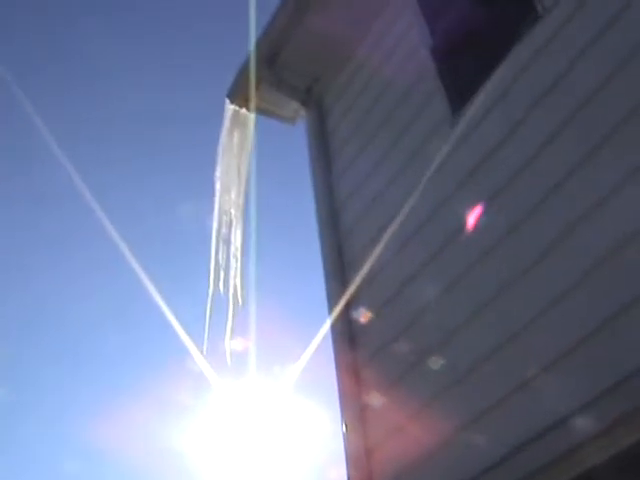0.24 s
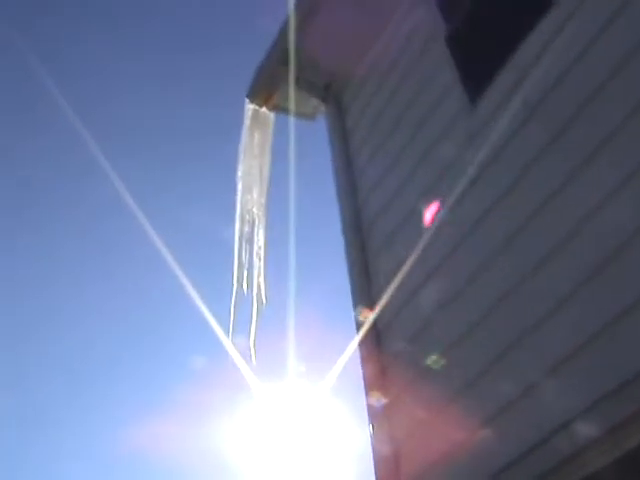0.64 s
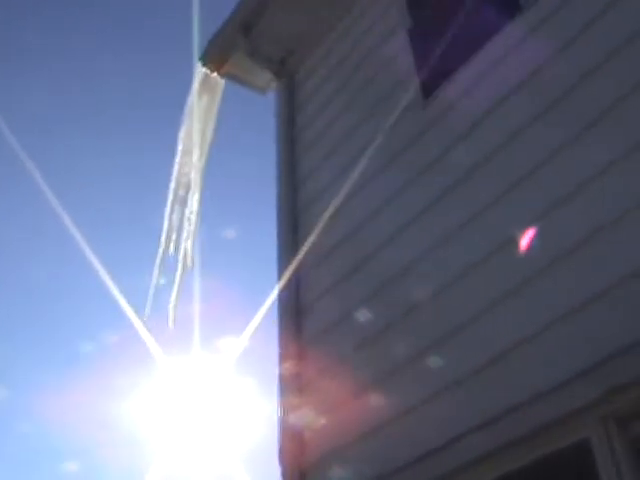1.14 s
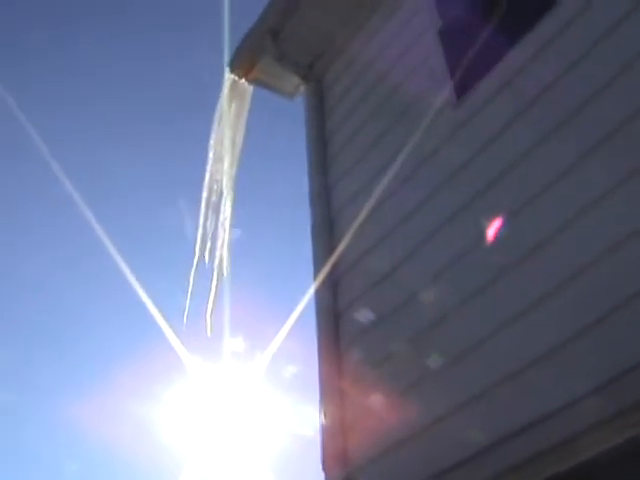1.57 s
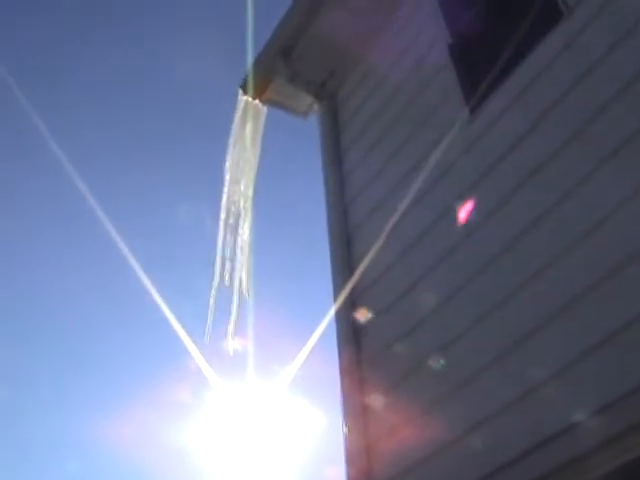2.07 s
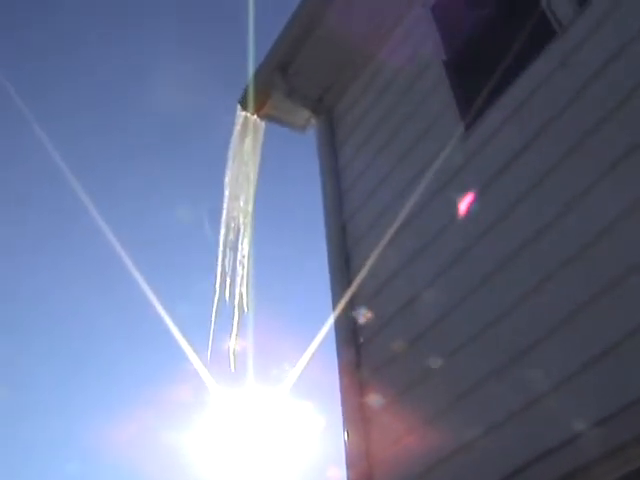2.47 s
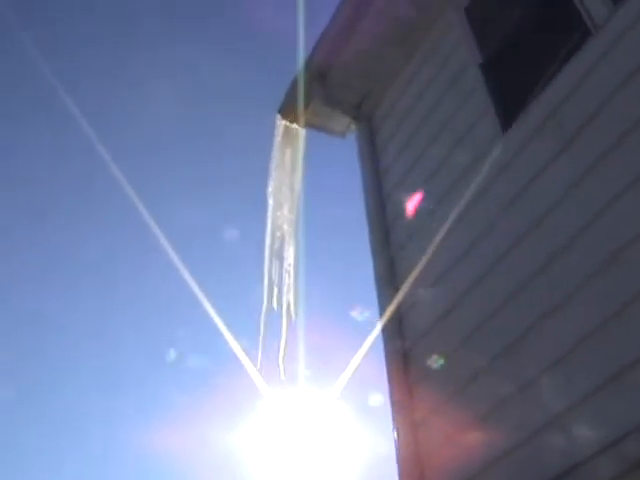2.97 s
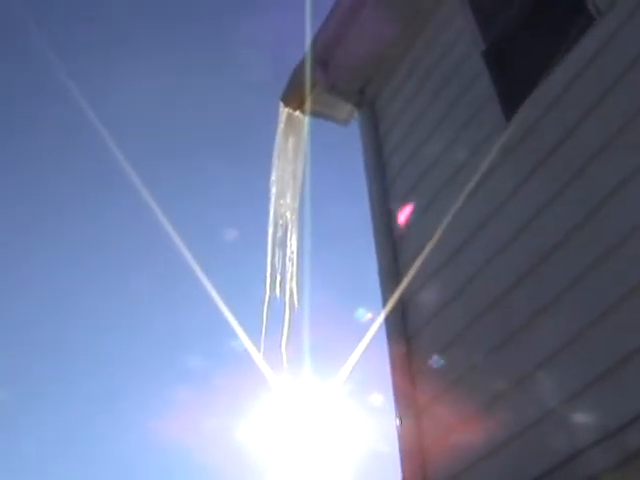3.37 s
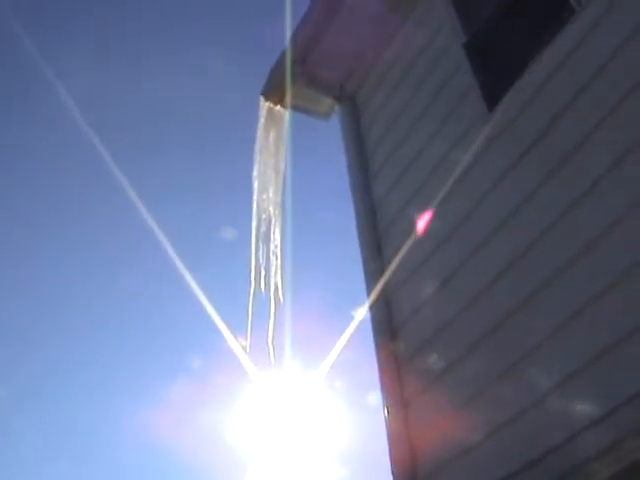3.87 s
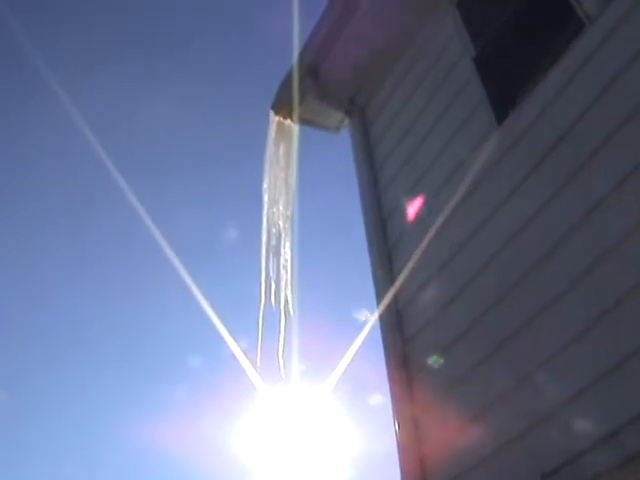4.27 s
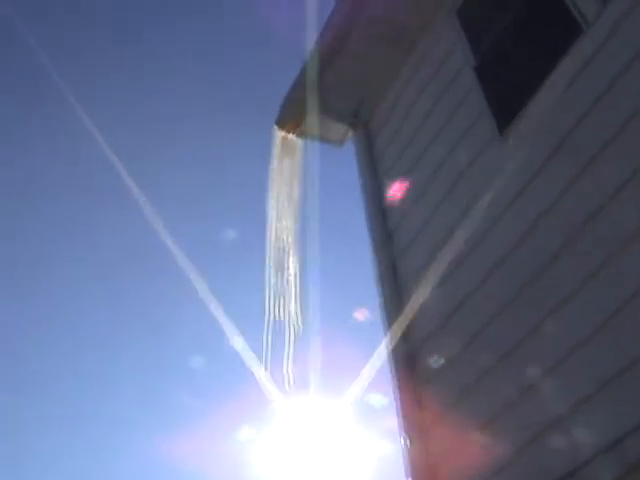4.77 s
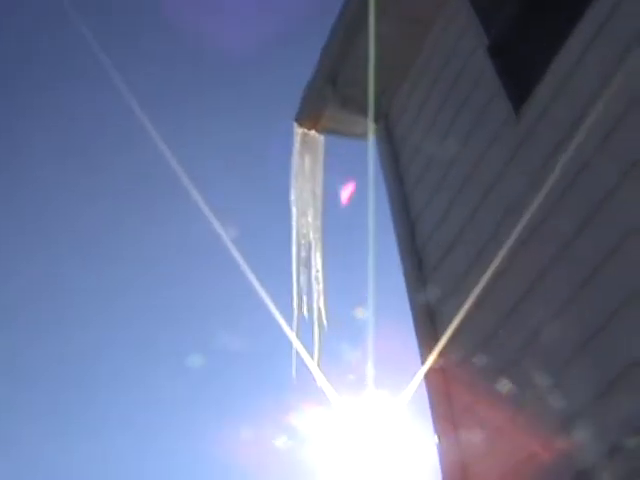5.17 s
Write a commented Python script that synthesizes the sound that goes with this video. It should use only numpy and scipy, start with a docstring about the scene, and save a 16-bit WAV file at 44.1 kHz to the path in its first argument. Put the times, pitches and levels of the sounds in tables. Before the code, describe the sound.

For the first second there is only a faint distant rumble, a low wavering hum and a few small ticks of hands on a paintball gun, outdoors in a yard. At about 1.1 seconds the gun fires, close on the right: a tiny hiss of gas running straight into a sharp, slightly hollow pop. It fires ten times in all, evenly, a little under half a second apart, the last at about 5.3 seconds. Soft trigger clicks come just before the shots. From the second shot, at about 1.6 seconds, each pop is followed a tenth of a second later by a bright, loud crack ahead as the ball bursts on icicles, then a light patter of paint and ice chips on the house wall. Pops and cracks leave short echoes around the yard. The final crack lands at about 5.4 seconds.

```python
"""Paintball shots at icicles

A paintball gun close on the right fires ten times at icicles under the eave of a house. Each time,
gas hisses behind the sliding bolt, then the barrel pops and throbs. Nine balls crack on the ice,
paint and chips patter on the wall, and the yard throws the sound back. The trigger and hands make
small ticks over a distant rumble and a wavering hum."""
import sys
import numpy as np
from scipy import signal
from scipy.fft import rfft, irfft, next_fast_len
from scipy.io import wavfile
from scipy.ndimage import uniform_filter1d

SR = 44100
rng = np.random.default_rng(int(sys.argv[2]) if len(sys.argv) > 2 else 0)


def bounce(signal):
    """Save signal as a 16-bit WAV file at the path given by the first command-line argument."""
    frames = np.transpose(np.atleast_2d(signal))
    limited = np.clip(frames, -1, 1)
    pcm = np.round(limited * 32767).astype(np.int16)
    wavfile.write(sys.argv[1], SR, pcm)


N = 239680

# The tone of the distant rumble. Each row: pitch in Hz, level in dB.
RUMBLE_TONE = [(12, -43), (20, 1), (49, -8), (104, -9.5), (154, -9.5), (187, -7.5), (337, -13.5),
               (849, -15.5), (923, -13), (1330, -23), (2460, -32), (3250, -50), (16000, -44)]
# How alike the rumble is left and right. Each row: pitch in Hz, likeness (1 means the same).
RUMBLE_LIKENESS = [(25, 1), (60, 1), (240, 0.89), (950, 0.54), (3770, 0.12), (15000, 0.57)]
# A soft rustle that comes and goes. Each row: time in seconds, level in dB.
RUSTLE_LEVELS = [(0, -59), (.35, -62), (.5, -62.5), (.75, -55), (.9, -63.5), (2.5, -60), (5.43, -55)]
# How long the yard echoes. Each row: pitch in Hz, seconds to fade by 60 dB.
ECHO_FADE = [(150, 0.38), (500, 1), (1500, 0.79), (4000, 0.6), (8000, 0.57), (15000, 0.41)]
# The tone of the echoes. Each row: pitch in Hz, level in dB.
ECHO_TONE = [(100, 8), (400, -9.5), (1000, 5.5), (3000, 3.5), (8000, 5), (15000, 0.5)]
# How far the left channel leads for sound from ahead. Each row: pitch in Hz, phase in radians.
PHASE_AHEAD = [(150, 0.015), (1000, 0.13), (2200, 0.47), (7500, -0.51), (10500, -0.39), (14000, 0.44)]
# The same for the gun at the side. Each row: pitch in Hz, phase in radians.
PHASE_BESIDE = [(110, -0.8), (220, 0), (1000, 0.75), (4400, 0.72), (7500, -1.3), (10500, -2), (14000, -5)]
# Ticks of hands and falling ice chips. Each row: start in seconds, level in dB, pitch in Hz,
# seconds to fade by 60 dB, width in octaves.
TICKS = [(0.0884, -27, 1500, 0.024, 1.4), (0.132, -43, 2600, 0.26, 2.1), (0.146, -49, 3250, 0.12, 0.18),
         (0.298, -25, 5340, 0.01, 0.94), (0.3436, -48, 4800, 0.035, 0.23), (0.638, -39.5, 5340, 0.035, 0.8),
         (0.698, -48, 5670, 0.028, 0.31), (0.797, -39, 5900, 0.049, 0.64), (0.726, -53, 5700, 0.02, 0.27),
         (1.053, -51, 5750, 0.088, 0.63), (1.4057, -24.5, 2900, 0.014, 2.2), (1.443, -40, 5870, 0.018, .6),
         (2.158, -30, 9000, 0.03, 0.79), (2.794, -28, 1790, 0.013, 1.5), (2.829, -34, 7200, 0.019, 0.57),
         (3.075, -53, 12000, 0.015, .4), (3.204, -26.5, 2410, 0.011, 0.12),
         (3.633, -30.5, 4340, 0.017, 1.4), (4.682, -41, 1420, 0.071, 1.8)]
# Double clicks of the trigger. Each row: start in seconds, level in dB.
TRIGGER_CLICKS = [(1.041, -41), (1.516, -38.5), (1.899, -40), (1.938, -35.5), (2.369, -42), (2.406, -33),
                  (2.8516, -36), (3.301, -42), (3.335, -33), (3.792, -35.5), (4.2782, -35), (4.717, -46),
                  (4.759, -38), (5.1846, -54), (5.229, -36.5)]
# Patter after a ball lands. Each row: start in seconds, level in dB, pitch in Hz.
PATTERS = [(1.214, -40, 2050), (1.2543, -29, 2430), (1.698, -29, 3630), (2.12, -24.5, 2870),
           (2.6007, -25, 2110), (3.051, -30.5, 2460), (3.519, -33, 2540), (3.98, -29, 2470),
           (4.461, -30.5, 2230), (4.939, -34.5, 3730), (5.417, -31.5, 2450)]
# Balls bursting on ice. Each row: time in seconds, crack level in dB, thud in dB above the crack,
# thud pitch in Hz, treble boost in dB per octave.
SPLATS = [(1.667, -2.5, -13, 2120, 12.5), (2.083, -4.5, -10.5, 1190, 4), (2.5395, -3.5, -14.5, 1250, 13),
          (2.9992, -2, -16, 1260, 14), (3.477, -2.5, -25, 1010, 9), (3.939, -3, -16.5, 1700, 12.5),
          (4.4226, -4.5, -12.5, 1100, 11), (4.9, -1.5, -14.5, 1770, 8.5), (5.3686, -5.5, -13, 1780, 13)]
# The tone of a cracking shell before that boost. Each row: pitch in Hz, level in dB.
CRACK_TONE = [(180, -9), (300, 2.5), (1060, -1.5), (2250, -1), (2740, -2.5), (6740, -5), (8090, -5.5),
              (9240, -11), (13000, -17), (16000, -31)]
# The tone of the gas behind the bolt. Each row: pitch in Hz, level in dB.
BOLT_TONE = [(180, -59), (300, -7), (1140, -9), (2000, -2.5), (5520, 0.5), (8220, -5.5), (13300, -13.5),
             (16000, -37)]
# The tone of the gas leaving the barrel, before its bass is cut. Each row: pitch in Hz, level in dB.
ROAR_TONE = [(470, 13.5), (800, -1.5), (1520, -5), (2050, -1.5), (2770, -4), (6820, -4), (12800, -12),
             (16000, -34.5)]
# The shots. Each row: pop time in seconds, hiss level in dB, pop level in dB,
# second throb in dB above the pop.
SHOTS = [(1.1160, -24, -6.5, -21), (1.5702, -22, -7, -3), (1.9904, -21.5, -9.5, 5.5),
         (2.4455, -23, -10, -0.5), (2.9030, -19.5, -8, -2), (3.3847, -21, -9, 1.5), (3.846, -21, -11, 3),
         (4.325, -20.5, -9, -1), (4.801, -21.5, -9, -1.5), (5.27, -24.5, -8.5, -1)]
# Two fences repeat each shot. Each row: delay in milliseconds, level in dB.
FENCES = [(20.8, -19), (30.6, -17.5)]

LEAD_S = .005  # build-up before a hiss or a crack
STROKE_MS, PINCH_MS = 14.0, 1.8  # the hiss starts, then is pinched off, this long before the pop


def amp(db):
    """Turn decibels into a factor to multiply by."""
    return 10 ** (np.asarray(db) / 20)


def evened(x):
    """Scale a signal to an average power of 1."""
    return x / np.sqrt(np.mean(x ** 2) + 1e-20)


def read(points, hz):
    """Look up a pitch in a table, sliding between its rows."""
    f, value = np.transpose(points)
    return np.interp(np.log(hz + 1), np.log(f + 1), value)


def add(mix, start_s, sound):
    """Put a sound into the mix at its start time."""
    part = mix[:, round(start_s * SR):][:, :sound.shape[1]]
    part += sound[:, :part.shape[1]]


def panned(sound, pan_db):
    """Move a sound left (plus) or right (minus)."""
    return sound * amp([[pan_db / 2], [-pan_db / 2]])


def later(x, ms):
    """The same sound, delayed."""
    return np.pad(x, ((0, 0), (round(ms * SR / 1000), 0)))[:, :x.shape[1]]


def flutter(size, depth_db, smooth_samples):
    """A level that wobbles at random."""
    return amp(depth_db * evened(uniform_filter1d(rng.standard_normal(size), smooth_samples)))


def noise(size, gain, likeness):
    """Two partly alike channels of noise, with their tone set by gain(hz)."""
    hz = np.fft.rfftfreq(size, 1 / SR)
    left, other = rfft(rng.standard_normal((2, size)))
    same = np.clip(likeness(hz) if callable(likeness) else likeness, -1, 1)
    right = same * left + np.sqrt(1 - same ** 2) * other
    return evened(irfft(gain(hz) * np.array([left, right]), size))


def peak(centre_hz, width_hz):
    """A tone curve that favours one pitch."""
    return lambda hz: 1 / (1 + ((hz - centre_hz) / width_hz) ** 2)


def close_likeness(hz):
    """Left and right hear a close source a little less alike in the treble."""
    return .93 - 0.075 * hz / (hz + 6000)


def mic_ports(x, phase):
    """The microphone's two openings hear each pitch slightly out of step."""
    size = next_fast_len(N)
    shift = np.exp(1j * read(phase, np.fft.rfftfreq(size, 1 / SR)))
    left = irfft(rfft(x[0], size) * shift, size)
    return np.array([left[:N], x[1]])


def background():
    """A distant rumble that swells, a fuzzy low hum, a faint whine and a soft rustle."""
    t = np.arange(N) / SR
    waves = [np.sin(2 * np.pi * (hz * t + rng.random())) / np.sqrt(hz) for hz in np.geomspace(.3, 8, 20)]
    swell_db = evened(sum(waves))
    rumble = noise(N, lambda hz: amp(read(RUMBLE_TONE, hz)), lambda hz: read(RUMBLE_LIKENESS, hz))
    hum = amp(-56) * noise(N, peak(centre_hz=103.3, width_hz=8), likeness=.98)
    rustle = noise(N, lambda hz: (1 + (np.log2((hz + 1) / 1600) / 2.76) ** 2) ** -1.8, likeness=0.34)
    rustle *= amp(np.interp(t, *np.transpose(RUSTLE_LEVELS)))
    whine = amp(-73) * noise(N, peak(centre_hz=2480, width_hz=60), likeness=0.32)
    return amp(-49.5 + swell_db) * rumble + hum + whine + rustle


def yard(x):
    """Walls, fences and trees return clumps of echoes; each pitch fades at its own speed."""
    echoes = rng.standard_normal((2, SR)) * (np.arange(SR) > 400)
    echoes *= flutter(SR, depth_db=1.6, smooth_samples=200)
    echoes[1] += 0.99 * echoes[0]  # the two sides partly share them
    echoes[0] *= 1.15
    hz, t, bands = signal.stft(echoes, SR, nperseg=256)
    fade = amp(read(ECHO_TONE, hz)[:, None] - 60 * t / read(ECHO_FADE, hz)[:, None])
    tail = signal.istft(bands * fade, SR, nperseg=256)[1]
    return signal.fftconvolve(x[None], tail / np.linalg.norm(tail[0]), axes=1)[:, :N]


def burst(db, centre_hz, fade_s, octaves, pan_db, rise_s, snap, grain_db):
    """A small knock makes a grainy burst of noise; the air dulls its top."""
    def tone(hz):
        band = (1 + (np.log2((hz + 1) / centre_hz) / octaves) ** 2) ** -1.5
        return band / (1 + (hz / 12500) ** 4)

    t = np.arange(8192) / SR
    tail = amp(-60 * t / fade_s) * flutter(8192, grain_db, smooth_samples=70)
    shape = (1 - np.exp(-t / rise_s)) * (tail + snap * np.exp(-t / 0.00053))
    return panned(amp(db) * shape * noise(8192, tone, likeness=0.85), pan_db)


def tick(db, centre_hz, fade_s, octaves):
    """A hand taps the gun, or a chip of ice lands."""
    return burst(db, centre_hz, fade_s, octaves, pan_db=-3.5, rise_s=0.00092, snap=0.22, grain_db=1.5)


def trigger(db):
    """A small part strikes and bounces once."""
    click = burst(db, 2800, fade_s=0.013, octaves=1, pan_db=-5.5, rise_s=0.000086, snap=0.14, grain_db=2)
    return click + amp(-4) * later(click, ms=6.7)


def patter(db, centre_hz):
    """Paint and chips rattle on the wall, whose boards give a short low knock."""
    rattle = burst(db, centre_hz, fade_s=0.14, octaves=1.82, pan_db=-2.5,
                   rise_s=.0006, snap=1.3, grain_db=2.5)
    boards = burst(db - 4.5, centre_hz=575, fade_s=0.075, octaves=0.47, pan_db=-2.5,
                   rise_s=0.0015, snap=0, grain_db=-0.5)
    return rattle + boards


def splat(db, thud_db, thud_hz, treble_db):
    """The shell cracks, the paint sprays briefly, and the ground sends back a duller copy."""
    t = np.arange(2048) / SR - LEAD_S
    shape = np.exp(-abs(t) / 0.0023) + 0.22 * np.exp(-abs(t) / 0.0042)
    shape *= np.clip(t / 0.0011 + 0.59, 0, 1)
    spray = noise(2048, lambda hz: amp(read(CRACK_TONE, hz) + treble_db * np.log2(1 + hz / 4000)), 0.91)
    crack = shape * spray
    crack /= abs(crack).max()
    # a short, dull knock with a quick soft rise sounds with the crack
    swell = np.exp(np.minimum(t, 0) / 0.00087 - np.maximum(t, 0) / 0.0031)
    thud = amp(thud_db) * swell * noise(2048, peak(thud_hz, width_hz=650), likeness=1)
    dull = signal.lfilter(*signal.butter(N=2, Wn=8000, fs=SR), crack + 1.3 * thud)
    ground = amp(-10.5) * later(dull, ms=8.8)
    return panned(amp(db) * (crack + thud + ground), pan_db=0.4)


def bolt(db):
    """Gas rushes behind the bolt in a fluttering hiss that is pinched off as the ball leaves."""
    t = np.arange(2048) / SR - LEAD_S
    open_s = (STROKE_MS - PINCH_MS) / 1000
    leak = .1 * np.exp(np.minimum(t, 0) / .0025)  # a little escapes before the valve snaps open
    rush = np.clip(t / 0.001, 0, 1) * (0.8 + 1.1 * np.exp(-abs(t - .002) / 0.001))
    pinch = np.exp(-np.maximum(t - open_s, 0) / .0018)
    shape = (leak + rush) * pinch * flutter(2048, depth_db=2.2, smooth_samples=60)
    hiss = noise(2048, lambda hz: amp(read(BOLT_TONE, hz)), close_likeness)
    return panned(amp(db) * shape * hiss, pan_db=-6.5)


def gas_roar(t, ages):
    """Each throb lets out a puff of swirling gas, over a roar that holds and then dies."""
    strengths = amp(6.6 * rng.standard_normal(8) - 3.1 * np.arange(8))[:, None]
    puffs = (strengths * np.exp(-ages / 0.0013) * (ages > 0)).sum(0)
    hold = np.clip(t / 0.00099, 0, 1) * np.exp(-np.maximum(t - .014, 0) / 0.0069)
    tail = 0.14 * np.clip(t / 0.0037, 0, 1) * np.exp(-t / 0.044)
    shape = hold * (0.51 + 1.28 * puffs) + tail
    gas = noise(len(t), lambda hz: amp(read(ROAR_TONE, hz)) * hz**2 / (hz**2 + 600**2), close_likeness)
    return panned(shape * gas, pan_db=-7)


def pop(db, second_db):
    """A pressure swing leaves the barrel and throbs inside it; a wall and two fences repeat it."""
    round_trip_s, swing_hz, ring_hz, heave_hz = 0.00288, 450, 365, 130
    t = np.arange(4096) / SR
    ages = np.maximum(t - np.arange(8)[:, None] * round_trip_s, 0)  # seconds since each throb began
    throb_db = np.r_[0, second_db, -8 - .3 * second_db - 9 * np.arange(6)] + .8 * rng.standard_normal(8)
    throbs = -np.sin(2 * np.pi * swing_hz * ages) * (ages / .00105) * np.exp(1 - ages / .00105)
    swing = (amp(throb_db)[:, None] * throbs).sum(0)
    # the air in the barrel rings on faintly once the throbs have died
    ring = np.cos(2 * np.pi * ring_hz * (t - .0011)) * np.clip(t / .014, 0, 1) ** 2
    ring *= amp(-12 + .3 * second_db - 60 * t / .1)
    # a low heave and the near wall's echo both grow with the second throb
    heave = np.cos(2 * np.pi * heave_hz * (t - .0031)) * (t / .0036) * np.exp(1 - t / .0036)
    heave *= amp(-17.5 + 0.28 * second_db)
    wall = amp(-13.5 + 0.85 * second_db) * later(panned(swing, 1.8), ms=8.3)
    roar = amp(-15) * gas_roar(t, ages)
    # the gun's metal body rings unevenly
    body = amp(-34 - 60 * t / 0.31) * noise(4096, peak(centre_hz=2530, width_hz=70), close_likeness)
    direct = amp(db) * panned(swing, -2.5) + roar + body
    fences = sum(amp(echo_db) * later(direct[::-1], ms) for ms, echo_db in FENCES)
    return direct + fences + amp(db) * (panned(ring, -0.83) + wall) + panned(heave, 1.2)


def scene():
    """Place the shots, hits and small sounds, then add the echoes and the background."""
    gun, hits, small = np.zeros((3, 2, N))
    spikes = np.zeros(N)  # a gas blast or a bursting ball reaches the far walls as a plain spike
    for start, hiss_db, pop_db, second_db in SHOTS:
        add(gun, start - STROKE_MS / 1000 - LEAD_S, bolt(hiss_db))
        add(gun, start, pop(pop_db, second_db))
        spikes[round(start * SR)] = amp(2)
    for start, db, *settings in SPLATS:
        add(hits, start - LEAD_S, splat(db, *settings))
        spikes[round(start * SR)] = amp(db)
    for table, source in (PATTERS, patter), (TICKS, tick), (TRIGGER_CLICKS, trigger):
        for start, *settings in table:
            add(small, start, source(*settings))
    # so small a barrel gives off no deep bass
    gun = signal.sosfiltfilt(signal.butter(N=2, Wn=62, btype="high", fs=SR, output="sos"), gun)
    spikes = signal.lfilter(*signal.butter(N=1, Wn=[700, 10000], btype="band", fs=SR), spikes)
    low_throb = signal.lfilter(*signal.butter(N=2, Wn=900, fs=SR), gun.mean(0))
    to_walls = amp(-11.5) * low_throb + amp(3.5) * spikes + amp(-14) * small.mean(0)
    # every 0.46 seconds gets its own scatter of echoes, so each shot's tail sounds a little different
    turn = np.arange(N) / SR // .46
    echoes = sum(yard(to_walls * (turn == k)) for k in range(12))
    return mic_ports(gun, PHASE_BESIDE) + mic_ports(hits + small + echoes, PHASE_AHEAD) + background()


def record(dry):
    """The microphone's amplifier rounds off the loudest peaks; then the highest treble is cut."""
    rounded = 1.33 * np.tanh(dry / 1.259)
    treble_cut = signal.firwin(511, cutoff=16300, window=("kaiser", 9), fs=SR)
    return signal.oaconvolve(rounded, treble_cut[None], "same")


dry = scene()
out = record(dry)
bounce(out)
```